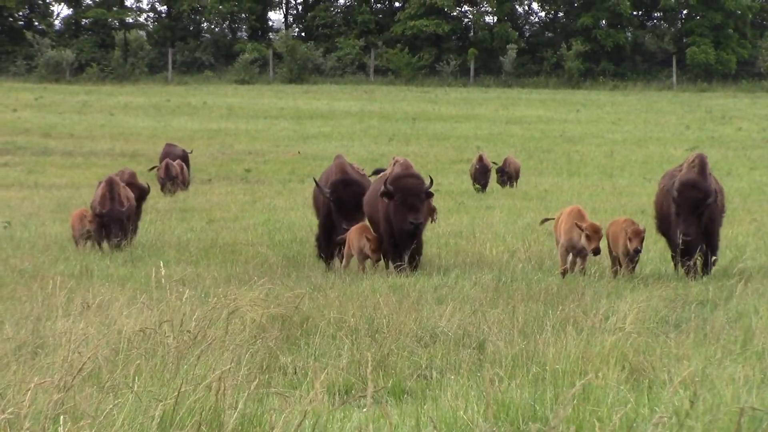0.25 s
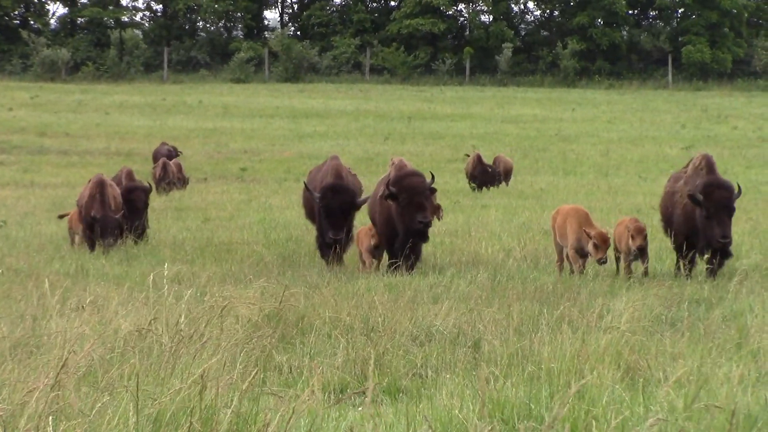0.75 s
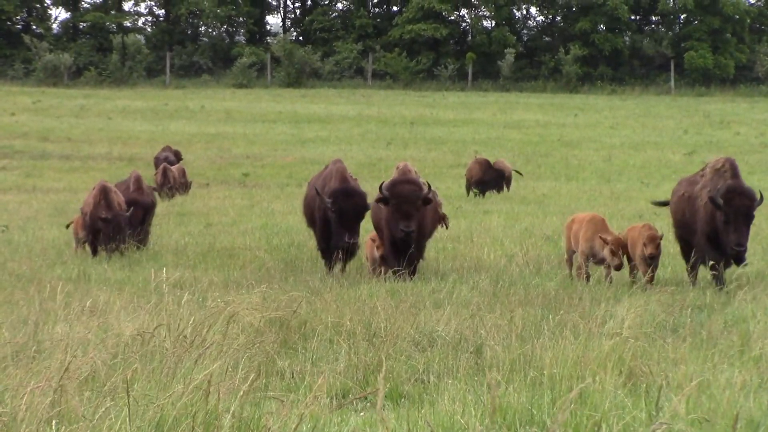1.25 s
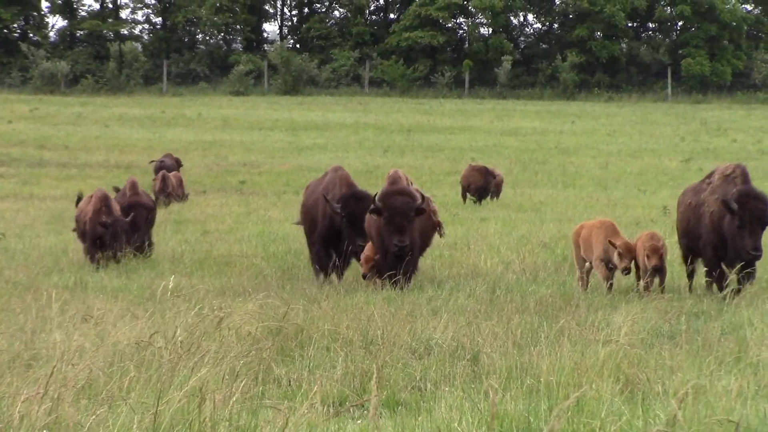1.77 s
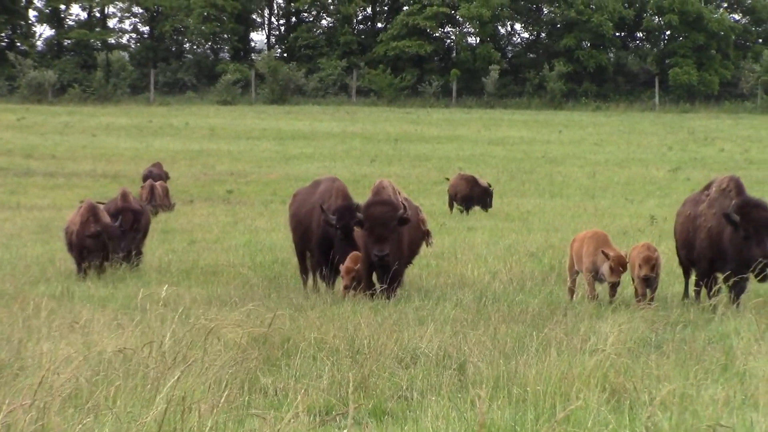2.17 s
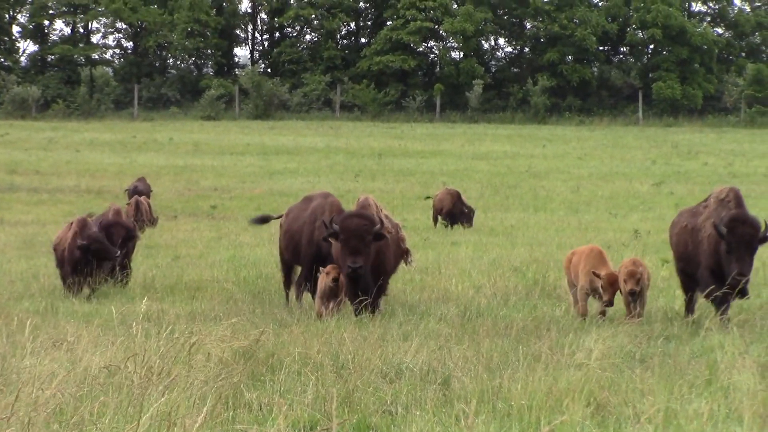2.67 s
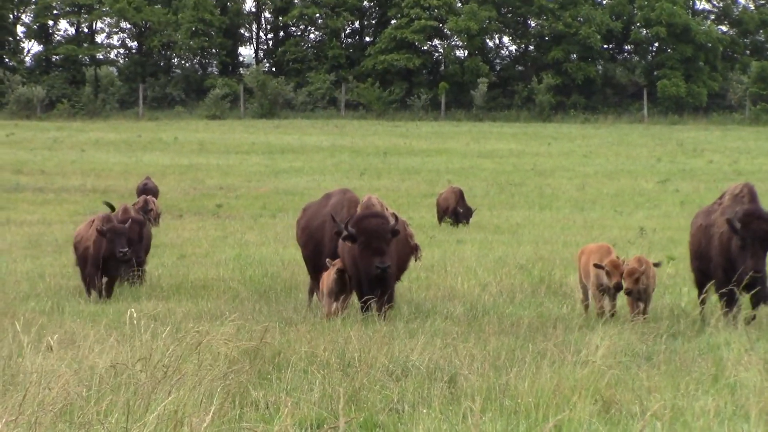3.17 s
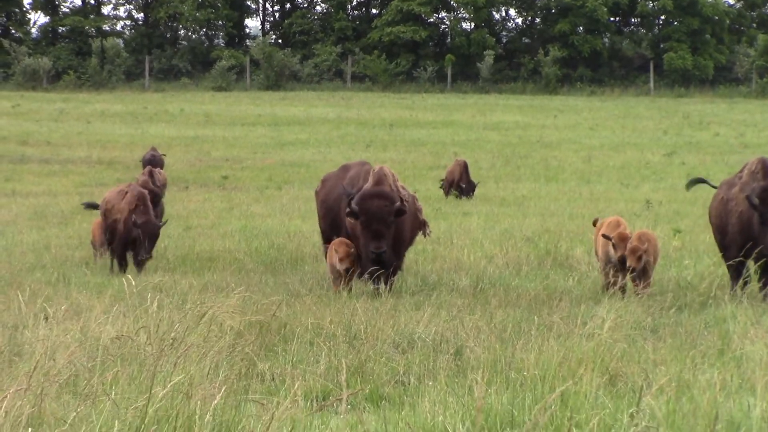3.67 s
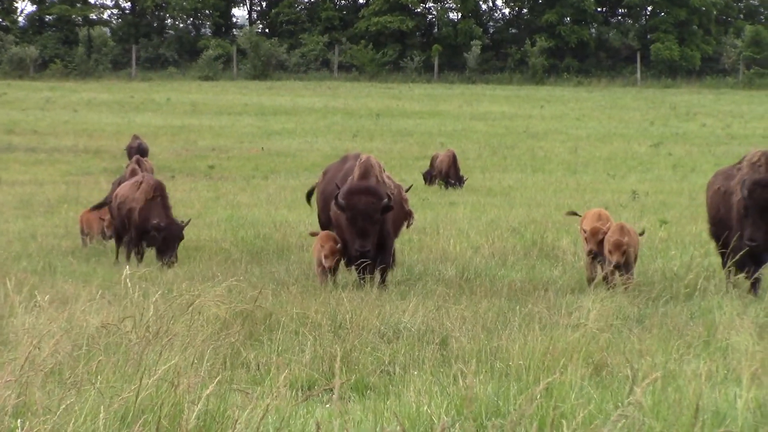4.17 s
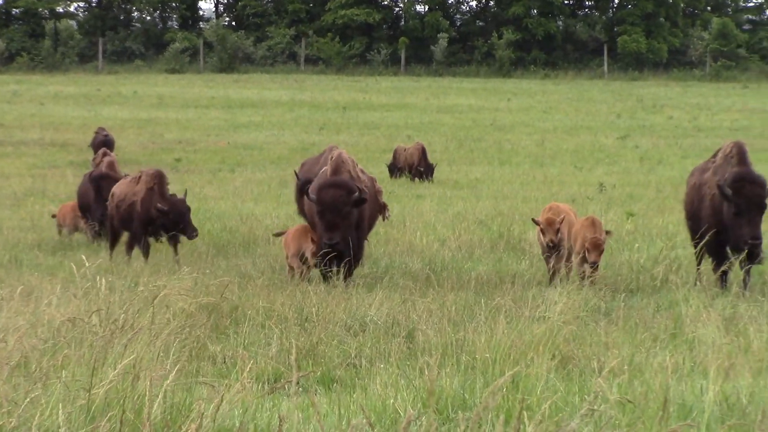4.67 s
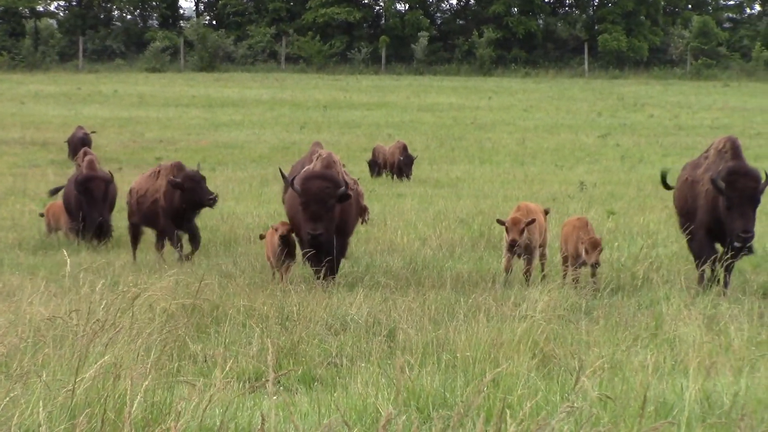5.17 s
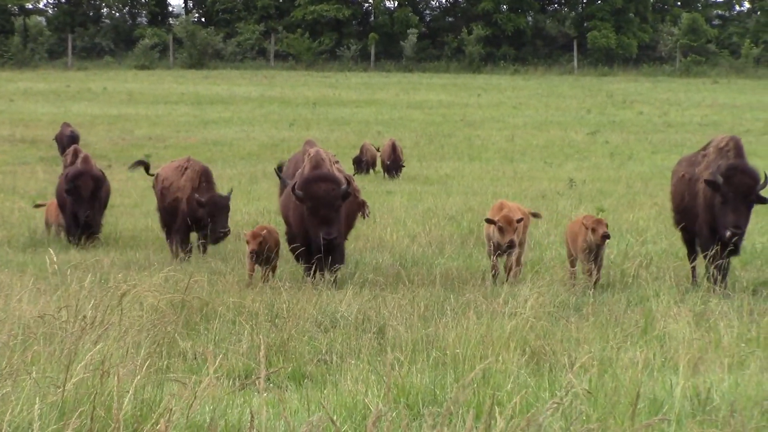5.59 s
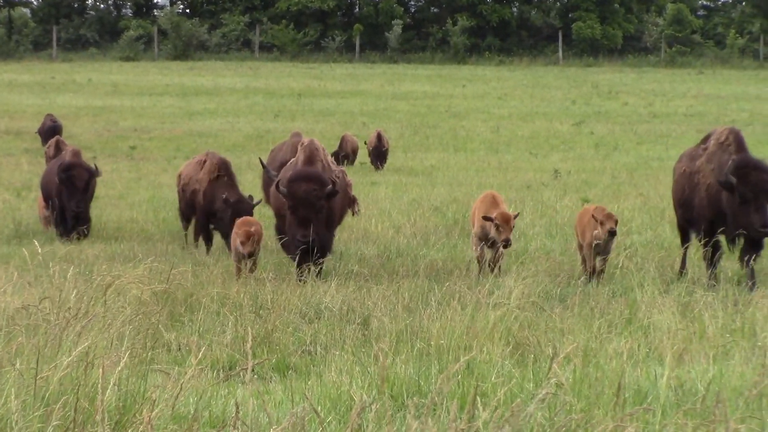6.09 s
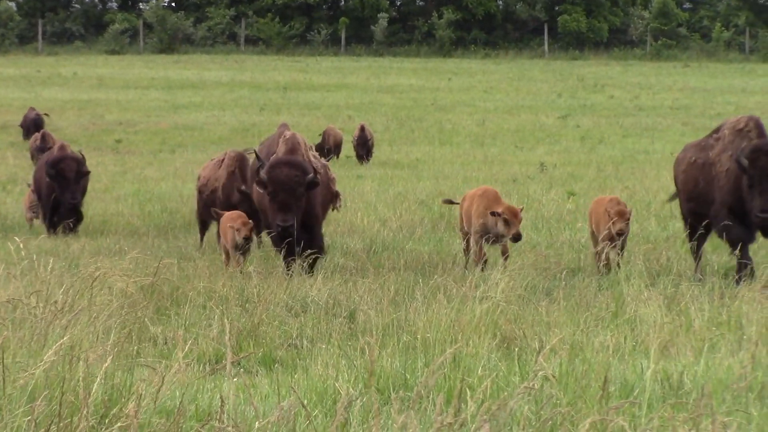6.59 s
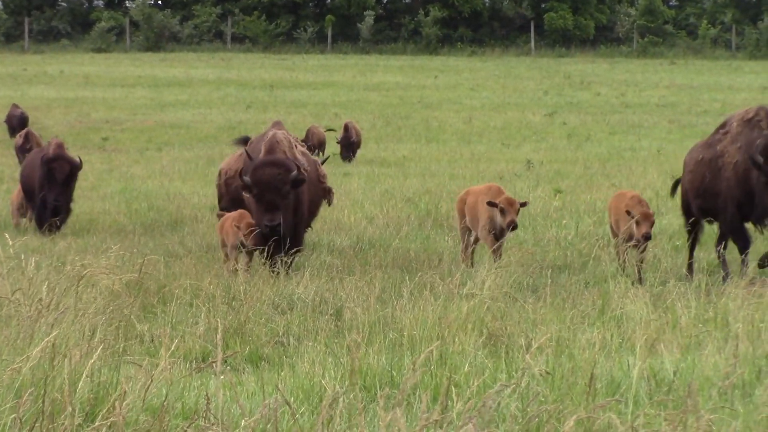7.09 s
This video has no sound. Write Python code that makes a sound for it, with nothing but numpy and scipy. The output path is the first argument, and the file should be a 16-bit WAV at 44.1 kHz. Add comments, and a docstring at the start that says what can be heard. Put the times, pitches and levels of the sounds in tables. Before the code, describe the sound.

Bison with calves in a grassy field: three brief, throaty, pulsing grunts spaced a couple of seconds apart, close to dry with only short reflections. Around them small birds whistle rapid glides and chip sharply, busiest in the middle. Gentle wind swells underneath, a brief faint insect-like buzz passes, and two dull bangs echo from afar, with muffled thuds from the herd. Natural stereo pickup outdoors.

```python
"""Bison grunt in a pasture: slow vocal-fold slaps ring a long throat, with short returns off the surroundings.
Around the herd many songbirds whistle glides and held notes and chip harshly; an insect-like tone buzzes.
Two dull distant bangs ring a few resonances and come back as echoes; low thuds come from the herd.
Under it all a breeze swells flickering noise in the grass. The stereo microphone drops the deepest bass."""
import sys
import numpy as np
from scipy import signal
from scipy.io import wavfile
from scipy.ndimage import uniform_filter1d

SR = 44100
rng = np.random.default_rng(int(sys.argv[2]) if len(sys.argv) > 2 else 0)


def int16_out(signal):
    """Quantize to a 16-bit WAV file."""
    q = np.round(np.clip(np.atleast_2d(signal).T, -1, 1) * 32767)
    wavfile.write(sys.argv[1], SR, q.astype(np.int16))


N = 323694  # length of the scene in samples


def undb(db):
    """Gain of a level in dB."""
    return 10 ** (np.asarray(db) / 20)


def ring(x, hz, width_hz):
    """Two-pole resonance; an impulse gives a damped sine that starts near height 1."""
    radius = np.exp(-np.pi * width_hz / SR)
    angle = 2 * np.pi * hz / SR
    return signal.lfilter([0, np.sin(angle)], [1, -2 * radius * np.cos(angle), radius ** 2], x)


def band(size, hz, width_hz):
    """Noise of rms 1 around a centre, rung twice by the same resonance."""
    x = ring(ring(rng.standard_normal(size), hz, width_hz), hz, width_hz)
    return x / x.std()


def walk(rate, size=N):
    """Random levels that slew to a new value each 1 / rate s; spread near 1."""
    hold = int(SR / rate)
    steps = np.repeat(rng.standard_normal(size // hold + 1), hold)
    return 1.39 * uniform_filter1d(steps, hold)[:size]


def add(out, x, start_s, pan_db=0.):
    """Mixes a sound into both channels; pan_db is left minus right."""
    i = max(int(start_s * SR), 0)
    x = x[:N - i]
    out[:, i:i + len(x)] += x * undb(np.array([[pan_db], [-pan_db]]) / 2)


def echoes(x, t60_s, wet_db, wide=0.11, patchy_db=4.5):
    """Adds scattered returns from grass, bodies and trees, a little different left and right."""
    t = np.arange(int(t60_s * SR)) / SR
    fade = undb(-60 * t / t60_s + patchy_db * walk(71.0, size=len(t))) * (t > .006)
    mid, side = rng.standard_normal((2, len(t))) * fade
    tail = (mid + wide * side * np.array([[1], [-1]])) / np.sqrt(np.sum(mid ** 2))
    return x + undb(wet_db) * signal.fftconvolve(x, tail, axes=1)[:, :N]


# tone of the meadow noise: pitch_hz, level_db (relative, per Hz of bandwidth)
MEADOW_TONE = [(30, -29), (80, 0), (200, 1), (600, -1), (1500, -13), (3000, -12.5), (5000, -21),
               (11000, -30), (15500, -50)]
# slow swells of the breeze: time_s, swell_db (full in the bass, less towards the treble)
BREEZE_SWELL = [(.9, -6.5), (1.05, 1), (1.9, -2.5), (2.7, -4), (3.9, -6), (4.3, 0), (5.2, -1.5),
                (5.999, -6), (6.5, -2.5), (7.34, -9.5)]
MEADOW_DB = -55.5  # rms over the last twentieth, ahead of the microphone


def meadow():
    """Noise bands half an octave apart that flicker; the breeze lifts the low and middle ones."""
    out = 0
    tone_hz, tone_db = np.transpose(MEADOW_TONE)
    time_s, swell_db = np.transpose(BREEZE_SWELL)
    breeze_db = np.interp(np.arange(N) / SR, time_s, swell_db) + 0.23 * walk(7.32)
    for hz in 30 * 2 ** np.arange(0, 9.2, .5):
        share = 1 / (1 + (hz / 1600) ** 2)  # how far the breeze reaches this band
        db = np.interp(np.log(hz), np.log(tone_hz), tone_db) + 10 * np.log10(hz)
        db = db + share * breeze_db + (0.91 + 2.22 * share) * walk(14)
        # left and right differ most in the deep bass and some way up the treble
        spread = 0.21 * (1 + (hz / 5000) ** 2 * np.exp(-(hz / 8000) ** 4) + 40 / hz)
        side = spread * band(N, hz, hz / 1.15) * np.array([[1], [-1]])
        out = out + undb(db) * (band(N, hz, hz / 1.49) + side)
    return out * undb(MEADOW_DB) / out[:, -N // 20:].std()


# low thuds from the herd: start_s, level_db (relative), pitch_hz
HERD_THUDS = [(1.587, -37, 142), (3.576, -36, 104), (4.274, -28, 213), (4.298, -29, 161),
              (4.318, -26.5, 180), (4.33, -32, 94), (4.372, -31.5, 134), (4.385, -36, 142.5),
              (4.417, -33.5, 176), (4.454, -34, 115), (4.624, -29, 153)]


def thuds():
    """Soft pushes: low sines that swell and die within a cycle or two."""
    out = np.zeros((2, N))
    t = np.arange(2000) / SR
    for start_s, db, hz in HERD_THUDS:
        cycles = t * hz
        push = (cycles / 0.5) * np.exp(1 - cycles / 0.41)
        add(out, undb(db - 0.5) * push * np.sin(2 * np.pi * cycles), start_s)
    return echoes(out, 0.061, -8.0, wide=1.0)


# two dull distant bangs: start_s, level_db (relative)
BANGS = [(0.9718, -22.5), (4.104, -20)]
# resonances of a bang: pitch_hz, level_db (relative), decay_s (roughly the time to fall 60 dB)
BANG_MODES = [(724, 6, 0.012), (293, -16, 0.029), (1094, -20.5, 0.084), (1920, -20.5, 0.037)]


def bangs():
    """A short dull pulse rings a few resonances; a short and a long tail of echoes follow."""
    out = np.zeros((2, N))
    blow = np.hanning(24)
    pulse = np.append(blow / blow.sum(), np.zeros(3000))
    pulse = signal.lfilter(*signal.butter(1, 190, "high", fs=SR), pulse)
    bang = sum(undb(g) * ring(pulse, hz, 2.4 / decay_s) for hz, g, decay_s in BANG_MODES)
    for start_s, db in BANGS:
        add(out, undb(db) * bang, start_s)
    short_tail = echoes(out, 0.18, -2.7)
    long_tail = echoes(out, 0.96, -9.0)
    return short_tail + long_tail - out  # both carry the direct bang, so one is taken away


# level of the buzz from start to end: time_s, level_db (relative)
BUZZ_LEVEL = [(1.681, -56), (1.75, -56.5), (2.14, -64)]


def buzz():
    """An insect-like steady 3400 Hz tone that buzzes at 69 beats per second, unevenly loud."""
    out = np.zeros((2, N))
    time_s, db = np.transpose(BUZZ_LEVEL)
    t = np.arange(time_s[0], time_s[-1], 1 / SR)
    beats = 0.53 + 0.44 * np.sin(2 * np.pi * 69 * t)
    level = undb(np.interp(t, time_s, db) + 6.1 * walk(63.6, size=len(t)))
    add(out, beats * level * np.sin(2 * np.pi * 3400 * t), time_s[0])
    return echoes(out, 0.35, -8.0)


SWELL_DB, FADE_DB = 11, 12.5  # level lost over a whole length before and after the loudest moment


def slur(start_s, length_s, from_hz, to_hz, bend, db, loudest):
    """Spells a glide out as (time_s, pitch_hz, level_db) points, fading away from its loudest moment."""
    u = np.linspace(0, 1, 16)
    glide = np.expm1(-bend * u) / np.expm1(-bend - 1e-9)  # the tiny offset avoids 0 / 0 at bend 0
    loss = SWELL_DB * np.maximum(loudest - u, 0) + FADE_DB * np.maximum(u - loudest, 0)
    return np.transpose([start_s + length_s * u, from_hz + (to_hz - from_hz) * glide, db - loss])


def whistle(points):
    """A near sine that follows the note, with soft ends and a slight flutter."""
    time_s, hz, db = np.transpose(points)
    t = np.arange(time_s[0] - .005, time_s[-1] + 0.0062, 1 / SR)
    ends = np.clip(np.minimum(t - t[0], t[-1] - t) / 0.0059, 0, 1)
    pitch = uniform_filter1d(np.interp(t, time_s, hz), size=150)
    level = undb(np.interp(t, time_s, db) + 2.5 * walk(97.8, size=len(t)))
    return ends * level * np.sin(2 * np.pi * np.cumsum(pitch) / SR)


# whistled glides: start_s, length_s, from_hz, to_hz, bend (above 0 glides early and levels off,
# below 0 glides late), level_db (relative), loudest (share of the length, 0-1)
GLIDES = [ (0.226, 0.025, 3350, 3130, -0.5, -55, 0.56), (0.264, 0.094, 3310, 2493, 4.5, -51.5, 0.64),
          (0.367, .032, 3250, 2330, -2, -53, 0.98), (0.701, 0.07, 2704, 2645, 2.5, -61, 0.77),
          (.775, 0.034, 2340, 2100, 3, -62, 0.55), (.805, 0.045, 2105, 2410, -0.5, -63, 0.46),
          (1.132, 0.043, 2180, 2890, -2.5, -62, 0.51), (1.162, 0.14, 2930, 2230, 7, -59.5, 0.37),
          (1.27, 0.034, 2160, 2980, -3, -54.5, 0.5), (1.304, 0.035, 2960, 2290, 2.5, -55.5, 0.66),
          (1.345, .045, 2110, 1960, 0.5, -59, .2), (1.654, 0.065, 3260, 3010, 4, -56, 0.62),
          (1.707, 0.023, 2990, 2320, -2.5, -48.5, .4), (1.732, 0.057, 2370, 2230, 1.5, -51.5, 0.42),
          (1.8, 0.036, 1905, 2390, 2.2, -54, 0.82), (1.832, 0.035, 2345, 2180, 5.5, -51.5, 0.58),
          (2.159, 0.053, 2800, 2655, 4, -56.5, 0.59), (2.235, 0.048, 3210, 2800, -1, -58, 0.69),
          (2.682, 0.042, 2810, 2150, 1.5, -58.5, 0.26), (2.753, 0.16, 2120, 2380, 1.5, -55, 1),
          (2.781, 0.024, 2610, 2780, 1.5, -54, 0.68), (2.817, 0.043, 2510, 2656, 3.5, -53.5, 0.48),
          (2.896, 0.031, 2120, 2270, -1.5, -58.5, .2), (3.163, 0.053, 3600, 3870, -0.5, -63, .1),
          (3.223, 0.071, 3130, 2690, -5.5, -55.5, 1), (3.319, 0.063, 2960, 2260, 1, -53, 0.41),
          (3.395, 0.065, 2040, 2400, -1.5, -54.5, 0.83), (3.466, 0.029, 2436, 2340, 1.5, -50, .1),
          (3.473, 0.13, 3940, 2500, 8, -58, 0.17), (3.487, 0.14, 4040, 3480, 0.5, -59.5, 0.647),
          (3.585, 0.052, 3650, 2560, 2.5, -57, 0.23), (3.634, 0.051, 2324, 2200, 5, -59.5, 0.22),
          (3.679, 0.043, 2410, 2520, 3, -65, 0.69), (3.725, 0.016, 2250, 2100, 3, -55.5, .4),
          (3.741, 0.14, 4180, 3570, 1, -57, 0.68), (3.765, 0.072, 2700, 2060, 2.5, -58, 0.17),
          (3.85, 0.032, 2130, 2290, 1, -56, 0.87), (3.9, 0.083, 2750, 1930, 3, -60, 0.26),
          (3.966, 0.022, 3420, 3380, 1, -50, 1), (4.015, 0.16, 4180, 3680, 4, -59.5, 0.48),
          (4.015, 0.049, 3550, 2995, 6, -53, 0.63), (4.062, 0.099, 2660, 2040, 12, -61, 0.25),
          (4.17, 0.09, 3050, 2200, 4, -59.5, 0.09), (4.244, 0.095, 3130, 3000, 1.8, -61.5, 0.43),
          (4.25, 0.12, 4100, 3850, 2.5, -59.5, 0.62), (4.299, 0.083, 2985, 2290, 4, -54, 0.35),
          (4.392, 0.019, 2135, 2410, 0, -59, .9), (4.415, 0.036, 2380, 2176, 2.2, -55, 0.41),
          (4.454, 0.1, 4200, 3980, 7, -58.5, 0.68), (4.61, 0.018, 3300, 2950, 4.5, -55, 0.43),
          (4.619, 0.11, 4200, 4021, 6.5, -60, 0.45), (5.33, 0.081, 5200, 4330, 1, -62.5, 0.97),
          (5.398, 0.1, 4340, 4150, 6.5, -60.5, 0.084), (5.748, 0.13, 2260, 2413, 2.5, -63, 0.47),
          (5.856, 0.043, 4520, 4160, 3.5, -56, 0.88), (6.363, 0.0336, 2930, 3231, 0.5, -61.5, 0.41),
          (6.396, 0.024, 3210, 2950, -4.5, -62.5, .2), (7.28, 0.056, 2950, 2640, 0.5, -64, 0.29), ]
# whistles held on one pitch: start_s, length_s, pitch_hz, level_db (relative)
HELD_NOTES = [(.395, 0.021, 2320, -54.5), (1.472, .076, 2420, -63), (2.588, 0.032, 2510, -61),
              (2.832, 0.069, 4780, -68), (3.103, .2, 4680, -71), (3.738, .05, 6780, -72),
              (3.96, 0.11, 6900, -73), (5.003, 0.058, 4040, -63), (5.3, 0.084, 4240, -66),
              (5.55, .04, 5840, -75), (5.56, .17, 2230, -69.5), (5.92, 0.033, 5760, -69),
              (6.199, 0.073, 3600, -64.5), (6.44, 0.088, 2304, -72), (7.18, 0.092, 4860, -72.5)]
# arched syllable, its shape: time_s (from its start), pitch_hz, level_db (added to each rendition)
ARCH_SHAPE = [(0, 3500, -10), (.02, 3800, 2), (.036, 3550, -2.5), (.055, 2600, -6)]
# renditions of the arch: start_s, level_db (relative)
ARCH_TIMES = [ (.175, -70.5), (.285, -64), (.385, -67), (.64, -60), (.725, -64), (.815, -67), (4.905, -64),
              (4.985, -57), (5.478, -55.5), (5.959, -57.5)]
# rising syllable, its shape: time_s (from its start), pitch_hz, level_db (added to each rendition)
RISE_SHAPE = [(0, 3270, -0.33), (.05, 4168, -0.86)]
# renditions of the rise: start_s, level_db (relative)
RISE_TIMES = [(5.125, -62.5), (5.2, -60.5), (5.602, -59), (5.678, -58), (6.083, -63), (6.163, -62)]


def whistles():
    """Glides, held notes and two repeated syllables, scattered left and right of the microphone."""
    out = np.zeros((2, N))
    notes = [slur(*note) for note in GLIDES]
    for shape, times in ((ARCH_SHAPE, ARCH_TIMES), (RISE_SHAPE, RISE_TIMES)):
        notes += [np.add(shape, (start_s, 0, db)) for start_s, db in times]
    notes += [slur(start_s, length_s, hz, hz, 1, db, 0.46) for start_s, length_s, hz, db in HELD_NOTES]
    for points in notes:
        add(out, undb(5.5) * whistle(points), points[0][0] - .005, 1.6 + 3.0 * rng.standard_normal())
    return out


# harsh chip calls: start_s, level_db (relative), pitch_hz (centre of the noise),
# width_hz (of the noise resonance), length_s, pan_db (left minus right)
CHIP_CALLS = [(0.555, -36.5, 3180, 312, 0.02, 2.5), (0.91, -37, 4230, 1220, 0.032, 3),
              (4.48, -34, 3280, 350, 0.019, 7), (4.789, -38.5, 4160, 1280, 0.035, 5),
              (6.771, -40.5, 4270, 1250, 0.041, 5)]
CHIP_PITCH_HZ, CHIP_RISE = 885, 0.093  # pitch of the voice in a chip, share of it climbed at the start
CHIP_VOICE_DB = -3.5  # voice over noise


def chips():
    """Noise and a pulsed voice share a centre pitch; the noise fades on after the call as its returns."""
    out = np.zeros((2, N))
    t = np.arange(8000) / SR
    for start_s, db, hz, width_hz, length_s, pan_db in CHIP_CALLS:
        calling = t < length_s
        shape = np.clip(t / 0.0037, 0, 1)
        shape = shape * np.where(calling, 1, 0.75 * undb(-60 * (t - length_s) / 0.088))
        climb = 1 - CHIP_RISE * np.exp(-t / 0.012) + 0.017 * walk(300., size=len(t))
        turns = np.cumsum(CHIP_PITCH_HZ * climb) / SR
        pulses = np.diff(np.floor(turns), prepend=0)
        voice = ring(ring(pulses, hz, 2.3 * width_hz), hz, 2.3 * width_hz) * calling
        voice = undb(CHIP_VOICE_DB) * voice / voice[calling].std()
        add(out, undb(db - 8.0) * shape * (band(len(t), hz, width_hz) + voice), start_s, pan_db)
    return out


def birds():
    """Whistling and chipping songbirds, with the returns of the pasture."""
    return echoes(whistles() + chips(), 0.35, -8.0)


# resonances that all callers share: pitch_hz, width_hz, level_db (relative)
HEAD_RESONANCES = [(1026, 330, -12.5), (3570, 36, -16), (4540, 83, -65)]
# resonances rung by the air alone: pitch_hz, width_hz, level_db (relative; wide ones gain with their width)
AIR_RESONANCES = [(2970, 1400, -26), (4630, 650, -29), (6760, 1900, -45), (7600, 1500, -34),
                  (11200, 3100, -53)]
WANDER = 0.025  # share by which the upper resonances move either way
BRIGHT_DB, SLAP_SCATTER_DB = -1.65, 2  # edge of a slap against its body; slap-to-slap spread
OPEN_DB = 33.5  # the fall of the flow, heard straight from the mouth


def grunt(rows, throat):
    """The folds part softly and slap shut; loose folds flutter instead, and air rasps through all along."""
    time_s, rate, db, firm = np.transpose(rows)
    t = time_s[0] + np.arange(int((time_s[-1] - time_s[0] + 0.31) * SR)) / SR
    size = len(t)
    phase = np.cumsum(np.interp(t, time_s, rate)) / SR
    effort = (t <= time_s[-1]) * undb(np.interp(t, time_s, db))
    firm = np.clip(np.interp(t, time_s, firm), 0, 1)
    scatter = rng.standard_normal((40, 2))[phase.astype(int)].T * SLAP_SCATTER_DB

    parting = np.diff(np.floor(phase), prepend=-1) * effort * undb(scatter[0])
    shut = np.roll(parting * firm, int(.0069 * SR))
    push = np.hanning(int(0.0024 * SR))[None]
    # parting folds ring the second resonance, the slap rings the first and third
    soft = signal.fftconvolve(np.array([-shut, parting, -shut]), push / push.sum(), "same", axes=1)
    # the bright edge comes as the folds meet and the flow starts to fall
    meeting = np.roll(shut, -int(0.00053 * SR)) + 0.17 * parting * firm
    edge = meeting * undb(BRIGHT_DB + np.roll(scatter[1], int(0.013 * SR)))

    # air bursts through after each edge, over a steady leak
    gust = signal.lfilter([1], [1, -np.exp(-1 / (0.0056 * SR))], edge)
    gust = gust + 0.086 * uniform_filter1d(effort, int(.012 * SR))
    puff = gust * rng.standard_normal(size) * undb(0.82 * walk(149.6, size=size))
    flutter = (1 - firm) ** 2 * effort * np.exp(-(phase % 1) / 0.4) * rng.standard_normal(size)

    low = sum(undb(g) * ring(pulse + 0.0057 * puff + 0.079 * flutter, hz, width)
              for pulse, (hz, width, g) in zip(soft, throat))
    low = low + undb(OPEN_DB) * soft[0]
    sharp = uniform_filter1d(0.078 * puff + 0.012 * flutter - 1.28 * edge, size=11)
    # the throat stretches and shortens, so the upper resonances wander from slap to slap
    short = np.clip(.5 + 1.9 * walk(20.2, size=size), 0, 1)
    high = sum(undb(g) * (ring(short * sharp, hz * (1 + WANDER), width)
                          + ring((1 - short) * sharp, hz * (1 - WANDER), width))
               for hz, width, g in throat[3:] + HEAD_RESONANCES)
    rasp = sum(undb(g) * ring(ring(puff, hz, width), hz, width) * width / 3000
               for hz, width, g in AIR_RESONANCES)
    return undb(-4.5) * low + undb(1.5) * high + undb(-12.0) * rasp


# one table per grunt: time_s, rate_hz (fold slaps per second), level_db (relative), firmness (of the slap, 0-1)
GRUNT_CALLS = [
    [(2.214, 32.4, -42.5, 0.33), (2.27, 35.5, -23, 0.32), (2.3, 35, -25.5, 1), (2.33, 34.6, -21.5, 0.54),
     (2.36, 31.3, -16, 0.56), (2.44, 40, -23.5, 1), (2.476, 49, -42, .4)],
    [(4.7227, 30.3, -24, .85), (4.82, 33.2, -20.5, .94), (4.92, 30.9, -23, .85), (5.04, 32, -22, .93),
     (5.112, 24.4, -29, .65)],
    [(6.5644, 33.6, -20.5, 0.9), (6.611, 35.9, -20, 0.66), (6.6655, 45.1, -17.5, 0.51),
     (6.7, 30, -24, 0.03), (6.724, 36, -17, 0.8), (6.752, 36.3, -23, 0.06), (6.779, 37.8, -19, 0.78),
     (6.83, 35.7, -22.5, 1), (6.855, 41, -22.5, 0.9), (6.885, 28.2, -26, 1), (6.92, 31.5, -20.5, 0.56),
     (6.975, 12.6, -30.5, 0.4)],
]
# throat of each caller, one table per grunt: pitch_hz, width_hz, level_db (relative)
CALLER_THROATS = [
    [(125, 39, -3.5), (240, 34, -3), (365, 74, 8), (606, 150, -12), (1260, 68, -17.5), (1950, 95, -21),
     (2760, 72, -45)],
    [(124.6, 24, -8.5), (233.5, 17, -3.5), (343, 66, 7), (607, 240, -9.5), (1272, 76, -12),
     (1460, 44, -25.5), (2980, 70, -20)],
    [(128, 38, -5.5), (245, 35, -5.5), (345, 64, 3.5), (594, 430, -6.5), (1317, 48, -16.5), (1910, 56, -31),
     (2400, 140, -22.5)],
]


def herd():
    """Each grunt through its caller's throat, with short returns."""
    out = np.zeros((2, N))
    for rows, throat in zip(GRUNT_CALLS, CALLER_THROATS):
        add(out, grunt(rows, throat), rows[0][0] - .0071)
    return echoes(out, 0.044, -10.5, wide=0.097)


def scene():
    """Meadow, thuds, bangs, buzz and birds around the grunting herd."""
    return meadow() + thuds() + bangs() + buzz() + birds() + herd()


def record(dry):
    """The microphone drops the deepest bass; the recorder cuts the top above 15650 Hz."""
    x = signal.sosfilt(signal.butter(4, 72, "high", fs=SR, output="sos"), dry)
    return signal.sosfilt(signal.ellip(10, .2, 70, 15650, fs=SR, output="sos"), x)


dry = scene()
out = record(dry)
int16_out(out)
```